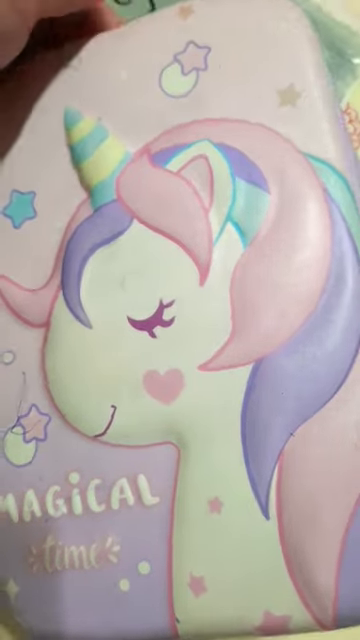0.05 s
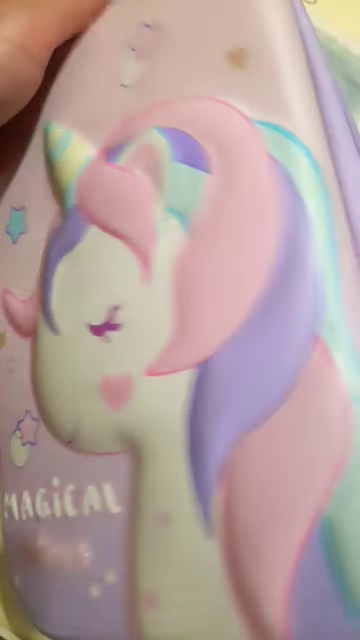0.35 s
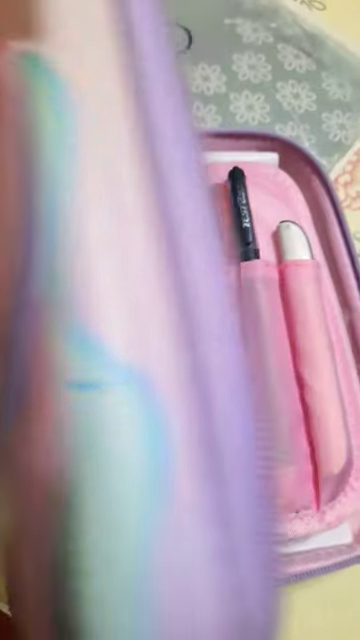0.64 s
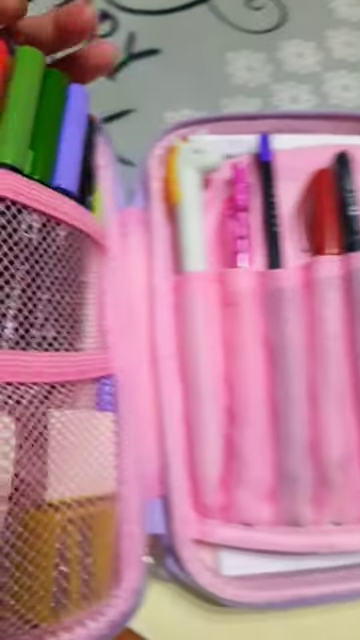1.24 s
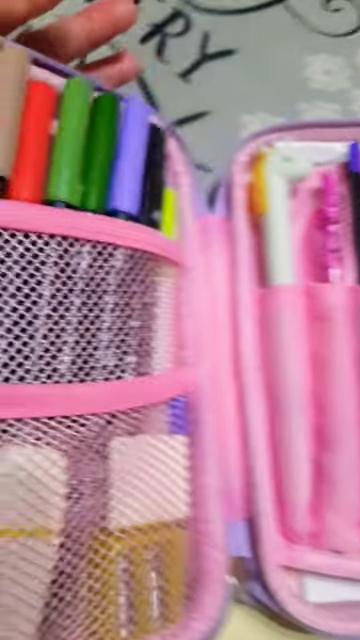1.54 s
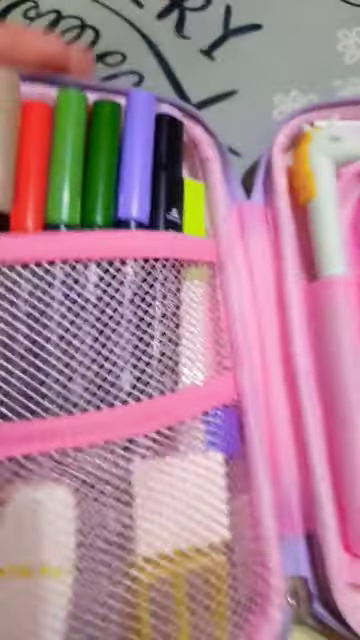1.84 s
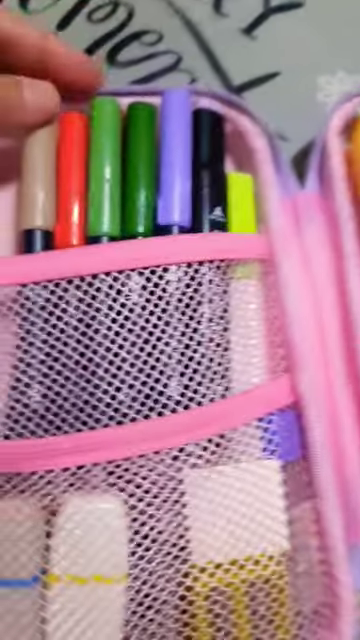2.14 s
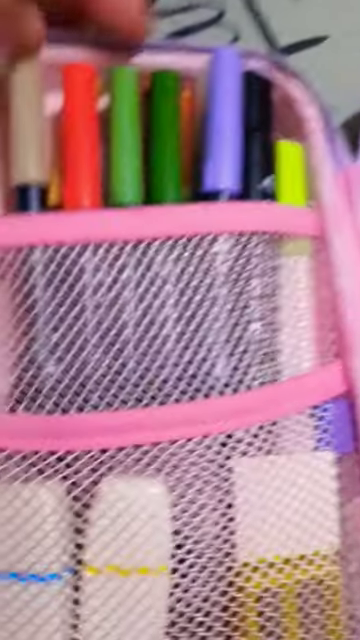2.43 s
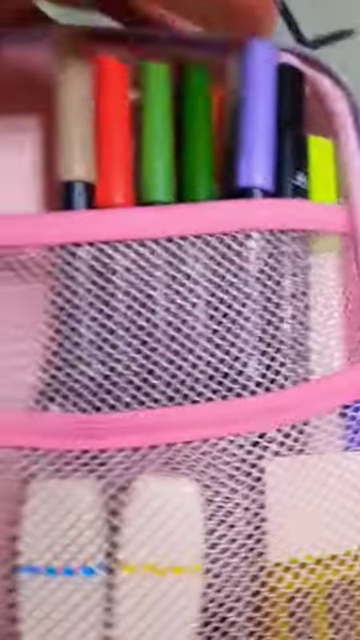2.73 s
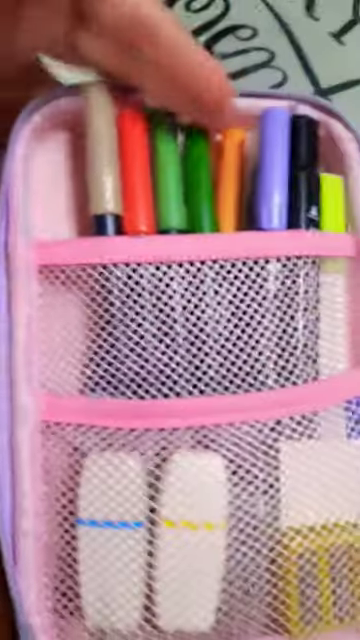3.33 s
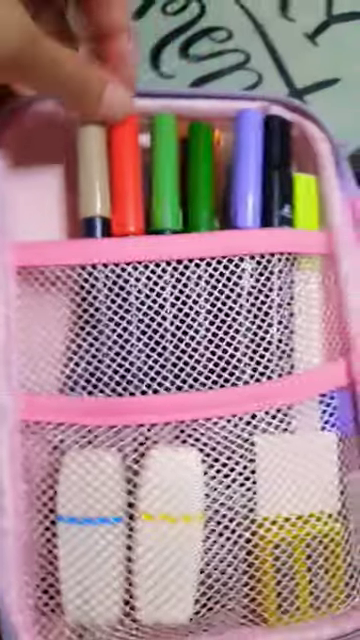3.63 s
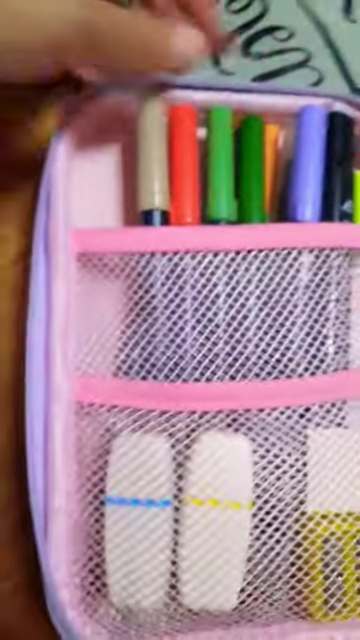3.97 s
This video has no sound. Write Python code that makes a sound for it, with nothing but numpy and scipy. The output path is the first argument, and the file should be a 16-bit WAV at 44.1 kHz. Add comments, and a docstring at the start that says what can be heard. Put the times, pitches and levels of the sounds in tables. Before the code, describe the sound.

A stiff pencil case is folded open on a table and lands with a short clatter. Fingers then nudge the pens, which click together amid soft fabric rustles, close by in a small, faintly humming room.

```python
"""A small humming room: a stiff zipped pencil case is folded open on a table, close by.
The lid lands with a short clatter, a knock of the padded shell and a scrape of the zip edge.
Fingers nudge the felt pens, which click together; each blow rings the hollow case and the room.
Hand, fabric lining and mesh pocket rustle softly over an appliance hum and a faint hiss."""
import sys
import numpy as np
from scipy import signal
from scipy.fft import rfft, irfft
from scipy.io import wavfile
from scipy.ndimage import uniform_filter1d

SR = 44100
rng = np.random.default_rng(int(sys.argv[2]) if len(sys.argv) > 2 else 0)


def master_out(mix):
    """Clip the mix to full scale and print it as 16-bit PCM to the path in sys.argv[1]."""
    frames = np.transpose(np.atleast_2d(mix))
    ceiling = np.clip(frames, -1, 1)
    pcm = np.round(ceiling * 32767).astype(np.int16)
    wavfile.write(sys.argv[1], SR, pcm)


N = 176400
T = np.arange(N) / SR
HIT_T = T[:2048]


def undb(db):
    """Decibels to gain."""
    return 10 ** (np.asarray(db) / 20)


def unit(x):
    """Scale to rms 1."""
    return x / np.sqrt(np.mean(x ** 2))


def burst(x, db):
    """Give a short sound the energy of 6 ms at this level."""
    return x * undb(db) * np.sqrt(.006 * SR / np.mean(np.sum(x ** 2, axis=-1)))


def pan(left_db):
    """Constant-power stereo gains, left over right by left_db."""
    return unit(undb(np.array([[left_db], [-left_db]]) / 2))


def shape(x, gain):
    """Filter by a function from Hz to gain."""
    n = x.shape[-1]
    hz = np.maximum(np.arange(n // 2 + 1) * SR / n, 1)
    return irfft(rfft(x) * gain(hz), n)


def colour(x, points):
    """Filter by (Hz, dB) points; rms 1."""
    hz, db = np.array(points, float).T
    return unit(shape(x, lambda f: undb(np.interp(np.log(f), np.log(hz), db))))


def resonate(x, hz, q, stages=1):
    """Two-pole band-pass stages in series."""
    w = 2 * np.pi * min(hz, SR * .45) / SR
    a = np.sin(w) / (2 * q)
    for _ in range(stages):
        x = signal.lfilter([a, 0, -a], [1 + a, -2 * np.cos(w), 1 - a], x)
    return x


def noise(size, spread=1):
    """Stereo noise; spread 0 is mono, 1 uncorrelated."""
    mid, side = rng.standard_normal((2, size))
    return unit(mid + spread * side * np.array([[1], [-1]]))


def walk(rate_hz):
    """Smooth random wander, rms 1."""
    hold = int(SR / rate_hz)
    steps = np.repeat(rng.standard_normal(N // hold + 1), hold)
    return unit(uniform_filter1d(uniform_filter1d(steps, hold), hold)[:N])


def add(out, start_s, x):
    """Mix x in at start_s."""
    i = int(start_s * SR)
    out[:, i:i + x.shape[-1]] += x[:, :N - i]


def swells(rows):
    """Envelope of half-sine swells."""
    return sum(undb(db) * np.sin(np.pi * np.clip((T - start_s) / length_s, 0, 1))
               for start_s, length_s, db in rows)


def grains(per_s=140):
    """Tiny random catches, as of fibres and skin; rms 1."""
    sizes = undb(-2 * np.minimum(rng.exponential(size=N), 3))
    return unit((rng.random(N) < per_s / SR) * sizes * noise(N))


def ring(hz, modes, cycles, rise_s):
    """Damped modes, detuned anew at each touch; all fall to 1/e in `cycles` periods of hz."""
    detune = 1 + 0.036 * rng.standard_normal(len(modes))
    tone = sum(undb(db) * np.sin(2 * np.pi * hz * ratio * d * HIT_T)
               for (ratio, db), d in zip(modes, detune))
    return tone * np.exp(-HIT_T * hz / cycles) * (1 - np.exp(-HIT_T / rise_s)) ** 2


def hiss():
    """Faint steady microphone hiss."""
    # Each row: frequency in Hz, relative density in dB.
    spectrum = [(1000, 10.5), (2500, -2), (4300, -2), (4620, 2.5), (5000, -5.5), (8000, -4.5),
                (11000, -10.5), (15000, -8.5)]
    return pan(1.5) * undb(-65) * colour(noise(N), spectrum)


def air():
    """Low rush of the room; near mono below 800 Hz."""
    # Each row: frequency in Hz, relative density in dB.
    spectrum = [(25, -24), (36, -12), (45, -5), (67, -2), (81, -12.5), (98, -2), (118, -6), (142, -11),
                (335, -5), (420, -9.5), (470, -13), (620, -22), (800, -20), (930, -33), (2000, -41.5),
                (15000, -61.5)]
    mid, side = rng.standard_normal((2, N))
    side = shape(side, lambda f: 0.92 * f / np.hypot(f, 800))
    return pan(1.43) * undb(-54.5) * colour(mid + side * np.array([[1], [-1]]), spectrum)


def appliance_hum():
    """Steady partials, each wavering slightly in level and phase."""
    # Each row: frequency in Hz, level in dB.
    partials = [(57.2, -52.5), (114.6, -54.5), (270, -71), (344.9, -67), (417.7, -63), (745, -75.5)]
    slope_db_per_s, waver_db, drift_rad = -0.04, 0.5, 0.34
    hum = 0
    for hz, db in partials:
        level_db = db + slope_db_per_s * (T - T.mean()) + waver_db * walk(4.35)
        phase = 2 * np.pi * (hz * T + rng.random()) + drift_rad * walk(3.675)
        hum = hum + np.sqrt(2) * undb(level_db) * np.sin(phase)
    return pan(1.43) * hum


def room(x):
    """Diffuse tail of a small room, shorter in the treble."""
    split_hz, onset_s = 2200, 0.0016
    t = T[:SR // 2]
    wash = noise(len(t), spread=0.15)
    low = shape(wash, lambda f: 1 / (1 + (f / split_hz) ** 4))
    tail = 0
    for band, t60_s, db in ((low, 0.25, -7.5), (wash - low, 0.18, -10.5)):
        fade = np.exp(-np.log(1000) * t / t60_s) * (1 - np.exp(-t / onset_s))
        tail = tail + undb(db) * band * fade / np.sqrt(np.sum(fade ** 2))
    return signal.fftconvolve(x, tail, axes=1)[:, :N]


def fabric_rustle():
    """Fabric slides under the hand: soft swells of hiss with fine grains."""
    # Each row: peak time in seconds, rise in seconds, fall in seconds, level in dB.
    strokes = [(.30, .06, 0.16, -65), (.58, 0.11, 0.17, -60.5), (1.32, 0.14, 0.3, -65.5),
               (1.57, 0.2, 0.12, -59), (1.93, 0.16, 0.095, -60.5), (2.36, 0.14, 0.085, -64),
               (2.72, 0.01, 0.057, -62.5), (2.83, 0.013, 0.027, -62), (3.04, 0.12, 0.057, -66.5),
               (3.29, 0.099, 0.13, -64), (3.58, 0.071, 0.099, -60), (3.71, 0.062, 0.05, -60),
               (3.92, 0.17, 0.045, -65.5)]
    # Each row: frequency in Hz, relative density in dB.
    spectrum = [(600, 10), (1200, 3), (1900, 5), (2600, 2), (3700, 3.5), (4300, 2), (4700, 2), (5300, 1),
                (8000, -0.5), (11000, -6.5), (15000, -2)]
    power = sum(undb(db) ** 2 * np.exp(-((T - peak_s) / np.where(T < peak_s, rise_s, fall_s)) ** 2)
                for peak_s, rise_s, fall_s, db in strokes)
    friction = colour(noise(N) + undb(-8) * grains(), spectrum)
    flutter_db = 0.84 * walk(25.57)
    return pan(2) * friction * np.sqrt(power) * undb(flutter_db)


def mesh_pocket():
    """Nylon mesh slides in thin bright swishes."""
    # Each row: start in seconds, length in seconds, level in dB.
    swishes = [(1.212, 0.049, -62), (1.29, 0.09, -62), (1.53, 0.28, -63.5), (1.885, 0.052, -59.5),
               (2.02, 0.21, -64.5)]
    # Each row: frequency in Hz, relative density in dB.
    spectrum = [(2000, -3), (5000, 0.5), (8000, -3), (13000, -1), (15500, -6)]
    return pan(1.1) * swells(swishes) * colour(noise(N) + 0.5 * grains(), spectrum)


def finger_rubs():
    """Fingertips drag along the pens: swells of midrange friction noise."""
    # Each row: start in seconds, length in seconds, level in dB.
    rubs = [(0.326, 0.18, -67.5), (2.014, 0.28, -64.5), (2.995, 0.088, -69), (3.202, 0.37, -69),
            (3.516, 0.4, -68), (3.865, 0.071, -59.5)]
    drag = resonate(noise(N) + 0.28 * grains(), hz=1430, q=0.77, stages=2)
    return pan(0.79) * swells(rubs) * unit(drag)


def zip_edge():
    """The zip edge scrapes as the case shifts: short runs of dense grit."""
    # Each row: start in seconds, length in seconds, level in dB.
    scrapes = [(.618, 0.048, -60), (1.472, 0.032, -41.5), (1.507, 0.015, -40.5), (2.327, 0.034, -45.5)]
    # Each row: frequency in Hz, relative density in dB.
    spectrum = [(500, -14), (1100, 12), (2000, 13.5), (5000, 3), (9000, -18), (15000, 1)]
    grit = 0.081 * noise(N) + grains(per_s=3900)
    return pan(4.2) * swells(scrapes) * colour(grit, spectrum)


def hollow_case(hits, t60_s=0.07):
    """Narrow resonances of the case and its pens ring on after each blow."""
    # Each row: frequency in Hz, gain in dB.
    modes = [(545, -10.5), (733, -10), (850, -3.5), (1170, -1), (1582, -12), (1940, -9), (3110, -4.5)]
    return sum(undb(db) * resonate(hits, hz, q=np.pi * hz * t60_s / np.log(1000)) for hz, db in modes)


def shell_knocks():
    """The padded shell knocks dully: soft onset, heavy damping."""
    # Each row: start in seconds, pitch in Hz, level in dB, left over right in dB, periods to 1/e.
    knocks = [(0.6209, 474, -40, 7, 1.16), (1.129, 650, -54.5, 18, 0.37), (1.4305, 810, -49.5, 7, 0.29),
              (1.433, 380, -51, 1, 0.88), (1.469, 665, -41, 12, 2.6), (1.471, 317, -37, 12, 8.4),
              (1.4778, 750, -36, 10, 1.5), (1.4855, 590, -46, 16, 0.88), (1.491, 764, -38.5, 17, 1.8),
              (1.5069, 617, -27.5, 12, 0.61), (1.509, 308, -38, 1.5, 3.1), (1.5145, 800, -45.5, -15, 0.66),
              (2.117, 580, -46, 5, 0.23), (2.25, 169, -49, 1, 1.6), (2.325, 253, -45.5, 7, 1.1),
              (2.331, 824, -50.5, 12, 2), (2.3397, 993, -41.5, 14, 1.8), (2.3412, 468, -41.5, 10, 0.26),
              (2.717, 636, -58, -3, 1.2), (3.201, 179, -45, -3, 3.6), (3.2863, 540, -49.5, 3, 0.5),
              (3.5937, 1026, -52.5, 10, 1.6)]
    # Each row: ratio to the pitch, relative level in dB.
    modes = [(1, 7.5), (.33, -2), (.52, 0.5), (.8, 6), (1.2, -32)]
    out = np.zeros((2, N))
    for start_s, hz, db, left_db, cycles in knocks:
        add(out, start_s, pan(left_db) * burst(ring(hz, modes, cycles, rise_s=0.0028), db))
    return out


def pen_clicks():
    """Pens and zip pulls touch: a sharp crack and a brief ring of the plastic barrel."""
    # Each row: start in seconds, ring pitch in Hz, ring level in dB, crack centre in Hz,
    # crack level in dB.
    clicks = [(0.093, 1620, -66.5, 6000, -73), (0.2654, 970, -58, 4830, -66),
              (0.3787, 3540, -59, 10300, -64.5), (0.435, 1680, -62, 3500, -73),
              (0.451, 2930, -61, 3000, -64), (0.49, 1950, -55, 4000, -74), (0.494, 1770, -51.5, 4000, -76),
              (0.617, 1600, -59, 7000, -55.5), (0.6302, 2000, -64, 5750, -54.5),
              (0.644, 2050, -54.5, 3970, -58), (0.88, 2940, -69, 7020, -62),
              (1.13, 1950, -53.5, 2000, -62.5), (1.2152, 4660, -67, 13900, -52.5),
              (1.431, 3870, -49.5, 2570, -50.5), (1.4697, 3340, -45.5, 7800, -46.5),
              (1.4848, 1910, -46, 8500, -50.5), (1.4849, 5300, -48, 5000, -43),
              (1.492, 1860, -57, 7900, -50), (1.5065, 3260, -48, 7000, -40.5),
              (1.5128, 1780, -55, 7900, -53), (1.905, 1500, -67, 15200, -51.5),
              (2.0488, 1410, -58, 2000, -77), (2.117, 1094, -46, 1480, -63), (2.208, 1560, -57, 2000, -79),
              (2.26, 1500, -54.5, 2000, -70), (2.286, 1650, -45.5, 1660, -52),
              (2.317, 5520, -47, 8400, -45), (2.3178, 10350, -45.5, 11000, -55),
              (2.3191, 1540, -42, 3880, -50), (2.331, 1770, -66, 8800, -48.5),
              (2.34, 5600, -57, 10800, -49), (2.346, 1580, -66, 11000, -59),
              (2.491, 1430, -57, 6000, -66.5), (3.038, 1850, -61.5, 3000, -80),
              (3.286, 2000, -55, 3500, -62.5), (3.362, 6900, -65, 8950, -66),
              (3.404, 1950, -61.5, 9800, -62.5), (3.4171, 2030, -61, 3000, -62),
              (3.5929, 6400, -48.5, 12000, -57), (3.5932, 1850, -46, 3540, -54),
              (3.615, 1830, -62, 7000, -63), (3.68, 1290, -58.5, 8000, -61.5),
              (3.735, 1230, -56, 1790, -64), (3.7466, 1050, -55, 2000, -76),
              (3.8967, 2100, -53.5, 6140, -58), (3.903, 1900, -55.5, 3500, -71)]
    # Each row: ratio to the pitch, relative level in dB.
    modes = [(1, 12.5), (.6, 2.5), (1.2, 2), (1.9, -25.5)]
    # Each row: ring pitch in Hz, left over right in dB.
    pan_by_pitch = [(1200, 17), (1800, 20), (2600, 15), (4000, -21), (10000, 12)]
    pan_hz, pan_db = np.array(pan_by_pitch).T
    rise_s, decay_s, scatter_s = 0.00045, 0.00015, 0.0036
    scatter = undb(-24) * np.exp(-HIT_T / scatter_s)  # the crack scatters inside the case
    envelope = (np.exp(-HIT_T / decay_s) + scatter) * (1 - np.exp(-HIT_T / rise_s))
    out = np.zeros((2, N))
    for start_s, ring_hz, ring_db, crack_hz, crack_db in clicks:
        crack = resonate(noise(len(HIT_T)) * envelope, crack_hz, q=0.75, stages=2)
        add(out, start_s, pan(2.5) * burst(crack, crack_db))
        barrel = ring(ring_hz, modes, cycles=2.2, rise_s=0.00041)
        add(out, start_s, pan(np.interp(ring_hz, pan_hz, pan_db)) * burst(barrel, ring_db))
    return out


def scene():
    """Knocks, clicks and scrapes ring the case and the room; friction and background stay dry."""
    hits = shell_knocks() + pen_clicks() + zip_edge()
    hits = hits + hollow_case(hits)
    reverb = room(hits)
    friction = fabric_rustle() + mesh_pocket() + finger_rubs()
    background = appliance_hum() + air() + hiss()
    return hits + reverb + friction + background


def record(dry):
    """Steep low-pass at 15.7 kHz."""
    return signal.sosfilt(signal.ellip(10, .2, 70, 15700, fs=SR, output="sos"), dry)


dry = scene()
out = record(dry)
master_out(out)
```